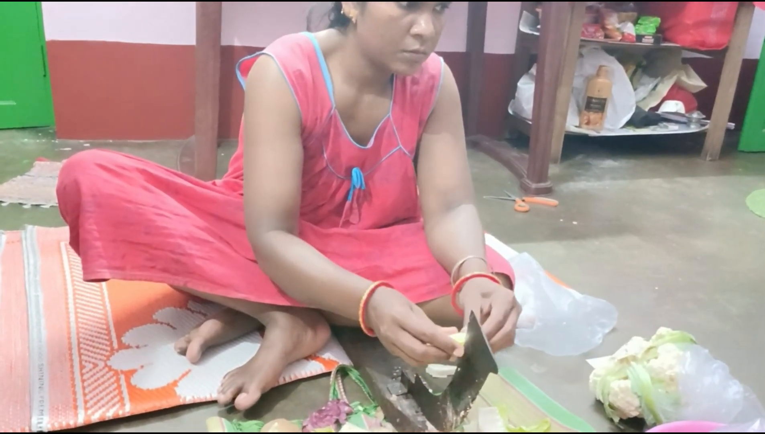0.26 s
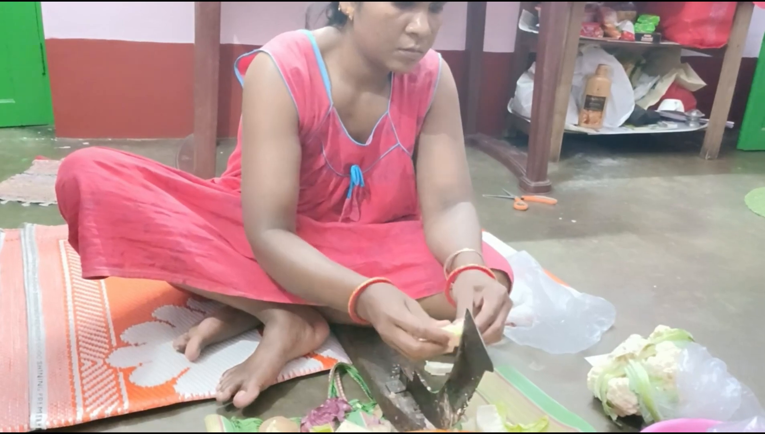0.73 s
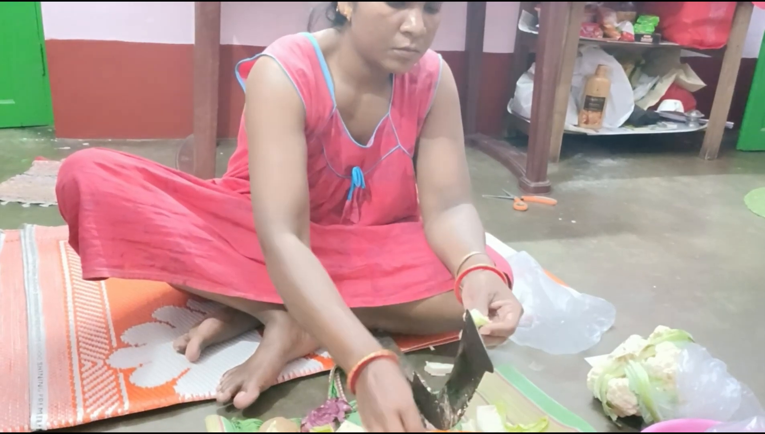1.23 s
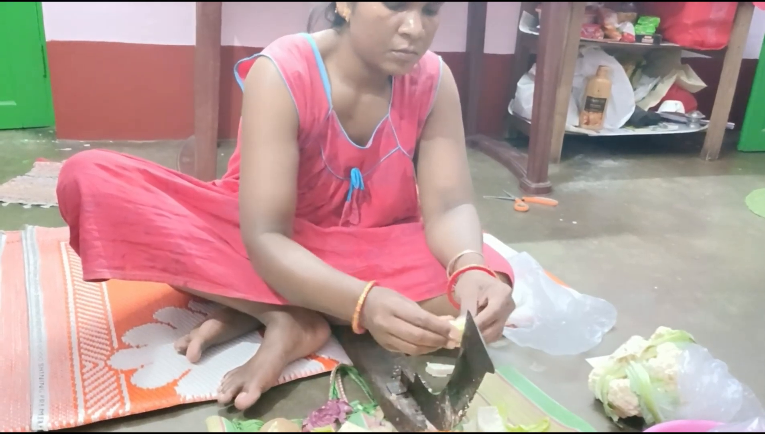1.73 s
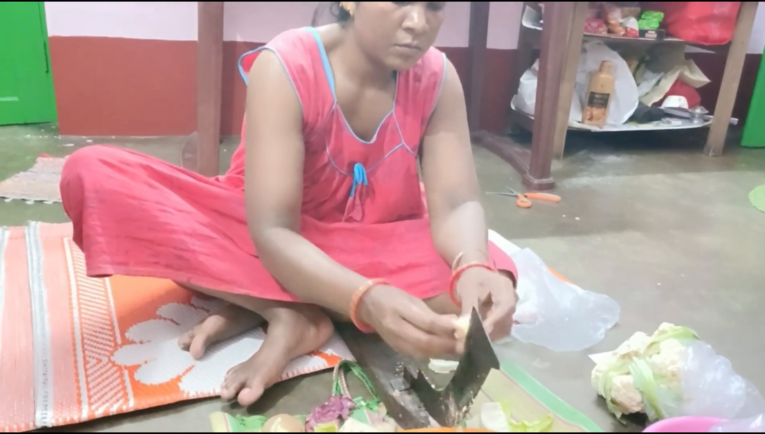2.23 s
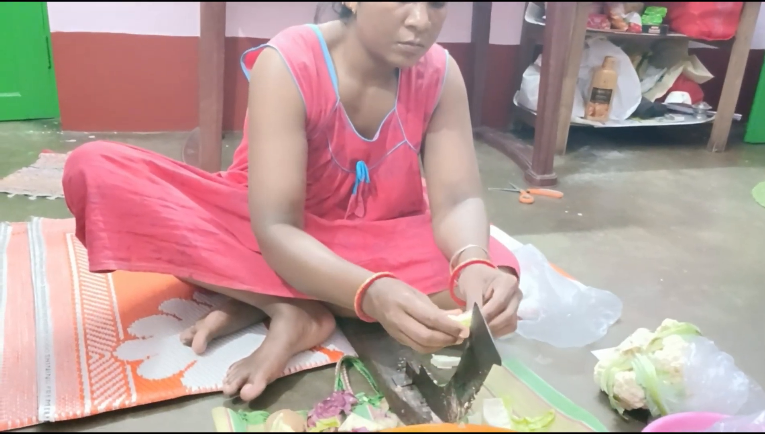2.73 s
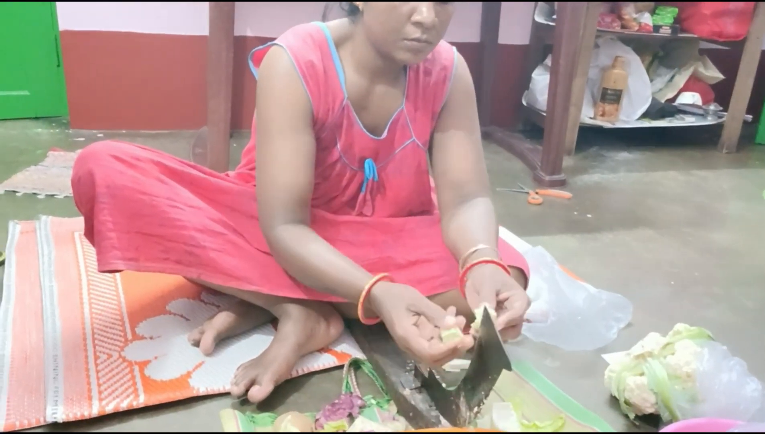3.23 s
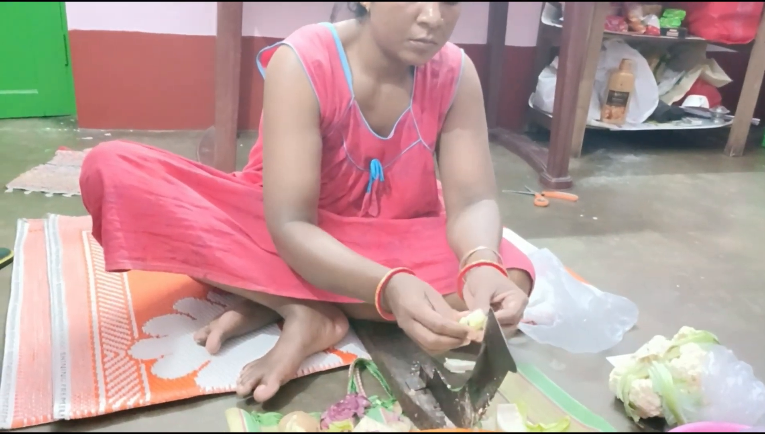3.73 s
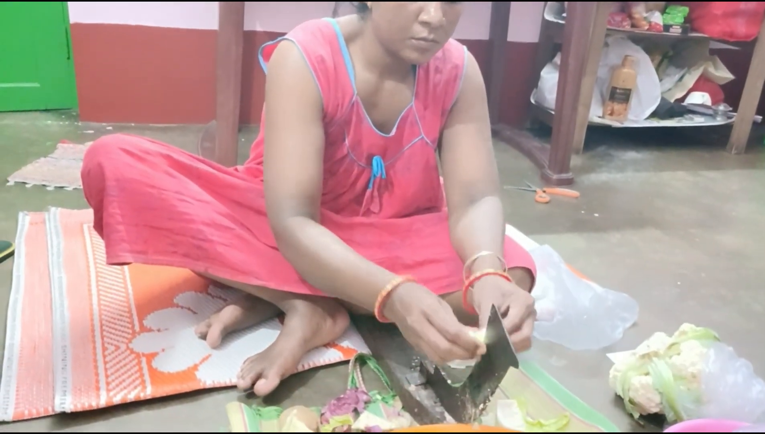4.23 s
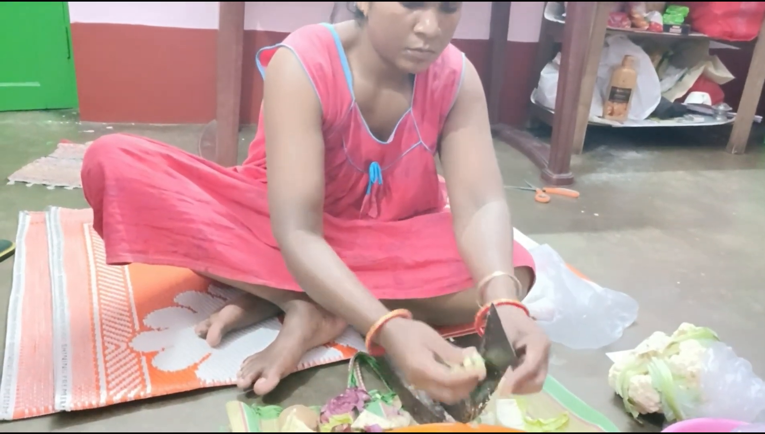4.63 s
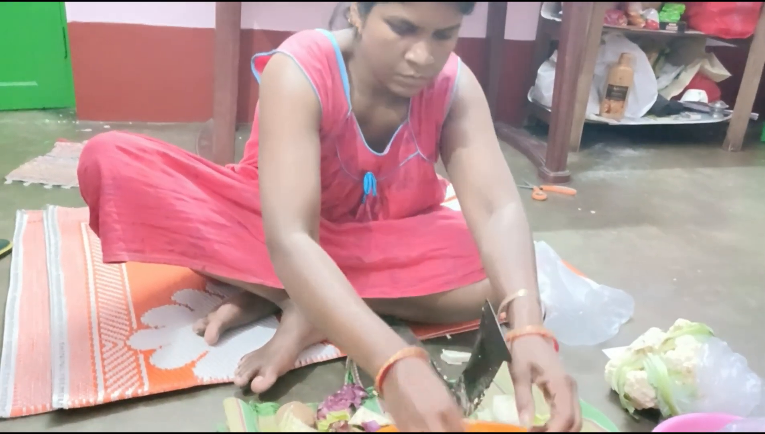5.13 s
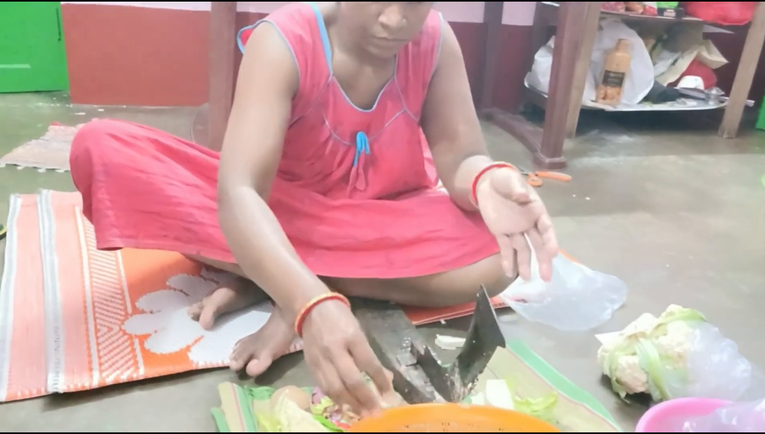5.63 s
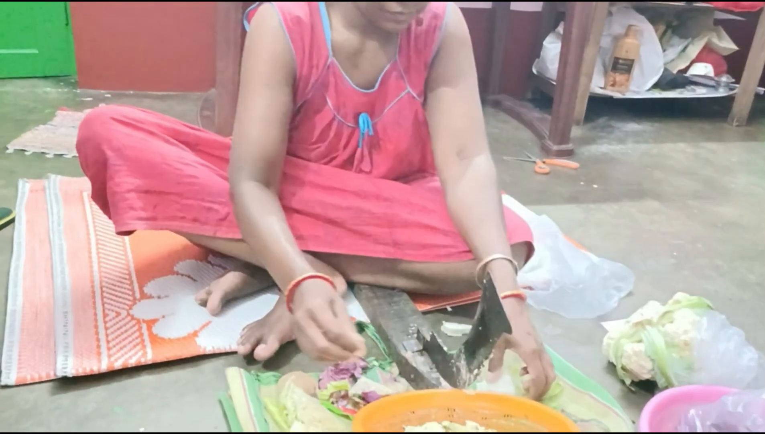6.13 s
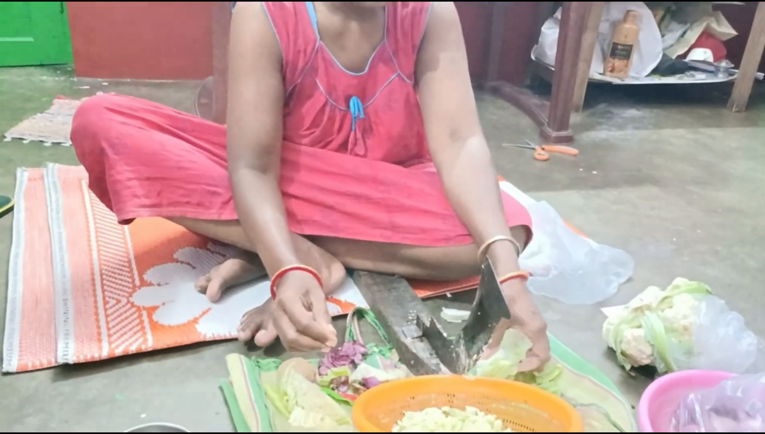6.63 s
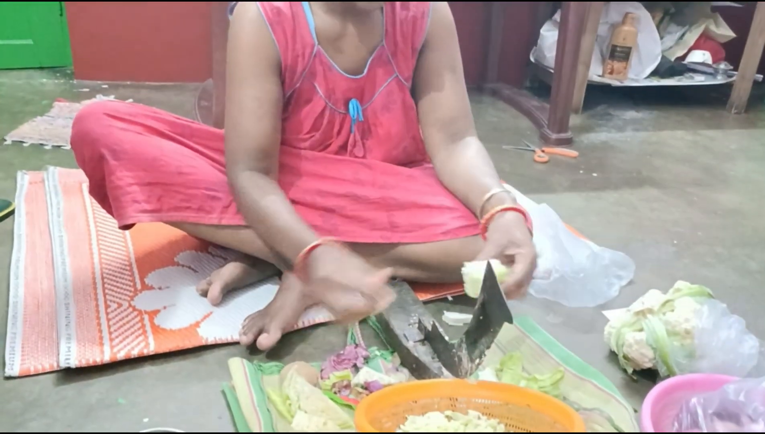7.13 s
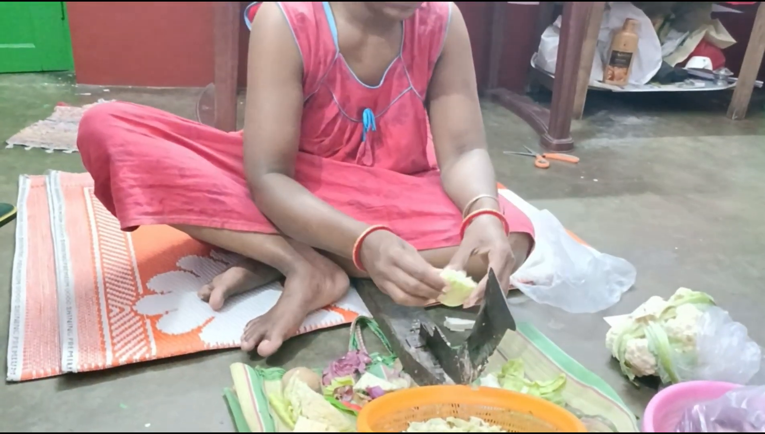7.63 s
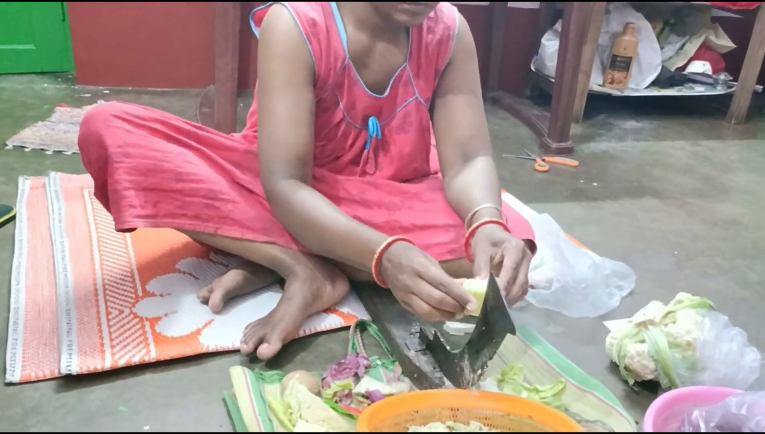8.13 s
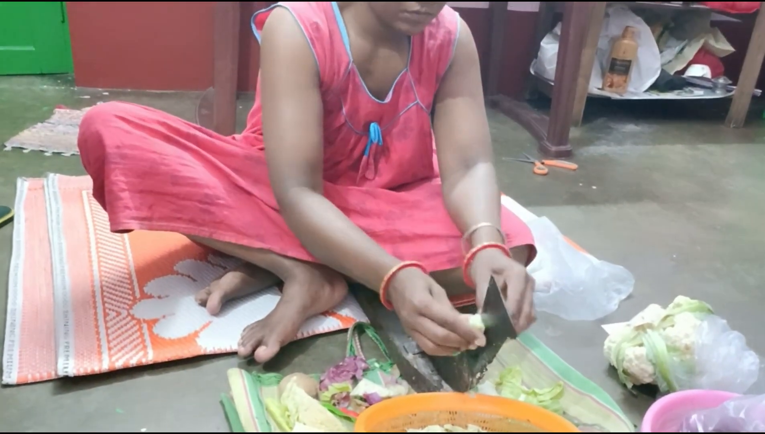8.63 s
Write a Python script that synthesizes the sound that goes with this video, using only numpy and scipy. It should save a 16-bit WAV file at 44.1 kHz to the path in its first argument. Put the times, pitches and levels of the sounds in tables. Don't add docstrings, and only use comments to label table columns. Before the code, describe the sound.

Cauliflower is broken against an upright steel blade, close to a phone microphone in a small hard-floored home. At 0-0.4 s crisp cuts and soft wooden knocks come with a faint steel ring. Light ticks follow, then a clear snap at 1.9 s and small pops near 2.1 and 2.5 s, with almost silent gaps until 3.2 s. From 3.4 s crunching and rubbing build, with low thuds; sharp stalk cracks crowd in from 4.1 s, a very hard snap lands at 4.5 s and another near 5.2 s amid bowl knocks. From 5.4 to 6.3 s scraps sweep over the mat in a bright, steady hiss. Short snaps and thuds cluster at 6.3-6.9 s, lighter ones around 7.2 s, crisp pops and rubbing at 7.6-8.2 s, then last cracks near 8.6 s and a hushed ending.

```python
import sys
import numpy as np
from scipy import signal
from scipy.fft import rfft, irfft, next_fast_len
from scipy.io import wavfile
from scipy.ndimage import uniform_filter1d, map_coordinates

SR = 44100
rng = np.random.default_rng(int(sys.argv[2]) if len(sys.argv) > 2 else 0)


def amplitude_ratio(level_db):
    exponent = np.asarray(level_db, float) / 20
    return 10 ** exponent


def wav_record(signal):
    frames = np.transpose(np.atleast_2d(signal))
    bounded = np.clip(frames, -1, 1)
    quanta = np.round(bounded * 32767).astype(np.int16)
    wavfile.write(sys.argv[1], SR, quanta)


N = 391166


def unit(x):
    return x / np.sqrt(np.mean(x ** 2) + 1e-20)


def along(points, hz):
    f, v = np.transpose(points)
    return np.interp(np.log(hz + 1), np.log(f + 1), v)


def wobble(rate, size):
    knots = rng.standard_normal(size // 8)
    return map_coordinates(knots, [np.arange(size) * rate / SR], order=1 + (rate < 100), prefilter=False)


def filtered(x, response):
    m = next_fast_len(N + SR // 2)
    return irfft(rfft(x, m) * response(np.fft.rfftfreq(m, 1 / SR)), m)[..., :N]


def above(hz, edge_hz):
    return 1 / (1 + (edge_hz / (hz + 1)) ** 6)


def patchy(depth_db, speckle):
    z = signal.stft(rng.standard_normal(N), nperseg=1024)[2]
    field = uniform_filter1d(rng.standard_normal(z.shape), size=12, axis=0)
    field = uniform_filter1d(field, size=3, axis=1)
    z = z * np.abs(z) ** speckle * amplitude_ratio(depth_db * unit(field))
    return unit(signal.istft(z, nperseg=1024)[1][:N])


def swells(s, rise, fade):
    late = np.arange(N * 1000 // SR + 2) / 1000 - s[:, None]
    return -60 * np.where(late < 0, -late / rise[:, None], late / fade[:, None]) ** 1.278


def summed(db):
    total = np.sqrt(np.sum(amplitude_ratio(2 * db), axis=0))
    return np.interp(np.arange(N) * 1000 / SR, np.arange(len(total)), total)


def hush(busy):
    # f/Hz, density/dB per Hz
    spectrum = [(18, -17.5), (30, 12), (90, 6.5), (702, -14.5), (780, -13), (2680, -19.5), (3770, -25),
                (4910, -19.5), (16000, -55)]
    level_db, follows, open_db = -64.5, 0.157, -59
    noise = patchy(depth_db=3, speckle=0.51)
    busy_db = 10 * np.log10(np.abs(uniform_filter1d(busy ** 2, size=SR // 8)) + 1e-10)
    sink_db = follows * np.minimum(busy_db - open_db, 0)
    gain = amplitude_ratio(level_db + sink_db + 1.2 * wobble(rate=3.8, size=N))
    return gain * unit(filtered(noise, lambda hz: amplitude_ratio(along(spectrum, hz))))


def room(x):
    # f/Hz, t60/s
    decay = [(150, 0.39), (1500, 0.28), (6000, 0.051), (12000, 0.042)]
    hz, t, z = signal.stft(rng.standard_normal(SR // 2), SR, nperseg=256)
    tail = signal.istft(z * amplitude_ratio(-60 * t / along(decay, hz)[:, None]), SR, nperseg=256)[1]
    return signal.fftconvolve(np.pad(x, (200, 0)), tail / np.linalg.norm(tail))[:N]


def steel():
    # f/Hz, level/dB
    modes = [(1098, -12), (1954, -4), (2008, -6), (3058, 2), (3601, -10), (4436, -5), (4484, -1),
             (5152, -2), (5200, -5), (6132, -6), (6153, -1), (7127, -5), (8070, -8), (9345, -10),
             (10260, -18), (12010, -21)]
    # t/s, level/dB, rise/s, fade/s
    rings = [
        (.36, -48, .2, .28),
        (1.39, -70, .01, .12),
        (1.62, -62, .4, .5),
        (1.86, -55, .5, .13),
    ]
    # start/s, end/s, f/Hz, level/dB
    lone = [
        (1.02, 1.07, 1070, -68),
        (1.03, 1.56, 9345, -85),
        (1.58, 1.66, 9345, -76),
        (1.17, 1.26, 6155, -81),
        (1.35, 1.44, 1093, -67),
        (.44, .53, 3058, -67),
        (1.57, 1.74, 1960, -57),
    ]
    size = 2 * SR
    t = np.arange(size) / SR

    def mode(hz):
        flutter = amplitude_ratio(6 * wobble(45, size))
        return flutter * np.sin(2 * np.pi * hz * t + 2.2 * wobble(80, size))

    def swell(start, end):
        return np.sin(np.pi * np.clip((t - start) / (end - start), 0, 1))

    s, peak_db, rise, fade = np.transpose(rings)
    envelope = summed(peak_db[:, None] + swells(s, rise, fade))[:size]
    together = envelope * unit(sum(amplitude_ratio(db) * mode(hz) for hz, db in modes))
    alone = sum(amplitude_ratio(db - 7) * swell(start, end) * mode(hz) for start, end, hz, db in lone)
    return np.pad(together + alone, (0, N - size))


def thuds():
    # t/s, peak/dB, f/Hz, t60/s
    knocks = [(0.254, -32.5, 289.3, 0.168), (0.323, -28, 299.4, 0.083), (0.843, -40, 291.3, 0.091),
              (1.01, -45, 284.4, 0.101), (1.714, -50, 272.8, 0.22), (1.876, -39, 217.4, 0.133),
              (3.363, -35, 241, 0.106), (3.516, -29, 171.9, 0.105), (3.64, -43, 505, 0.107),
              (3.64, -25.5, 152.5, 0.185), (4.032, -24.5, 149.7, 0.0716), (4.215, -32, 223, 0.156),
              (4.313, -19.5, 206, 0.034), (4.791, -17.5, 184.7, 0.104), (4.897, -23.5, 221, 0.132),
              (5.1, -20, 163.3, 0.121), (5.153, -17.5, 344, 0.039), (5.318, -33.5, 150.3, 0.11),
              (5.533, -29.5, 201, 0.072), (5.554, -29, 290.6, 0.07), (5.574, -31.5, 332, 0.068),
              (6.665, -29, 240, 0.118), (7.285, -41, 349, 0.11), (5.729, -34.5, 293.4, 0.098),
              (6.09, -44, 504, 0.18), (6.329, -27, 137.5, 0.041), (6.615, -23, 122.8, 0.125),
              (6.84, -34, 104.3, 0.087), (7.147, -37, 224, 0.114), (7.218, -28.5, 305, 0.09),
              (7.531, -48.5, 156.6, 0.064), (7.633, -44.5, 118, 0.18), (8.1, -30, 271.2, 0.19),
              (8.532, -37.5, 290.4, 0.08), (8.583, -37.5, 408.2, 0.18)]
    out, t = np.zeros(N + SR), np.arange(SR // 3) / SR
    for s, db, hz, t60 in knocks:
        swell = 1 - np.exp(-t / 0.0044)
        out[round(s * SR):][:len(t)] += amplitude_ratio(db - 60 * t / t60) * swell * np.sin(2 * np.pi * hz * t)
    return out[:N]


def hollows():
    # start/s, end/s, first f/Hz, last f/Hz, level/dB
    wide = [(7.535, 7.6, 2300, 2200, -57), (7.66, 7.72, 1900, 1800, -48), (.83, 0.92, 5300, 5880, -44),
            (5.927, 6.035, 1570, 1580, -31.5), (5.96, 6.17, 2400, 3000, -39), (6.842, 6.87, 780, 760, -41),
            (7.74, 7.89, 1450, 2100, -43), (7.72, 7.3, 3600, 3300, -46), (7.76, 7.89, 5500, 5100, -51.5),
            (2.045, 2.196, 1600, 1000, -53), (1.9, 2.1, 7400, 7900, -77), (4.765, 4.843, 3350, 2700, -29.5),
            (6.84, 6.941, 2500, 2200, -48), (1.716, 1.798, 2850, 3200, -48), (1.94, 2.03, 1080, 1050, -55),
            (8.74, 8.87, 4900, 3600, -65.5), (1.198, 1.58, 288.6, 287.7, -71),
            (5.1, 5.317, 1450, 1700, -25.5)]
    # start/s, end/s, first f/Hz, last f/Hz, level/dB
    tight = [(.245, 0.27, 4075, 4130, -45), (.322, 0.362, 5140, 5200, -43.5),
             (.322, 0.356, 6220, 6140, -48), (.305, 0.342, 2257, 2197, -37.5),
             (1.385, 1.428, 4110, 4040, -66), (1.385, 1.405, 7400, 7400, -70.5),
             (1.858, 1.93, 1060, 1040, -36), (5.525, 5.577, 694, 667.6, -41),
             (5.1, 5.16, 199.7, 209, -27.5), (5.11, 5.202, 388.2, 374, -30),
             (6.845, 6.911, 511.2, 503, -44), (4.328, 4.367, 1809, 1788, -27.5),
             (4.51, 4.555, 1700, 1650, -30), (4.671, 4.721, 1346, 1309, -32),
             (7.66, 7.737, 844.4, 891, -45.5), (7.66, 7.717, 1486, 1512, -42.5)]
    out, size = np.zeros(N + SR), SR // 3
    for start, end, first_hz, last_hz, db, width in [(*row, .38) for row in wide] + [(*row, .1) for row in tight]:
        u = np.clip(np.arange(size) / min(SR * (end - start), size), 0, 1)
        phase = 2 * np.pi * np.cumsum(first_hz + (last_hz - first_hz) * u) / SR
        width_hz = min(width * first_hz, 2500)
        narrow = wobble(width_hz, size) * np.sin(phase) + wobble(width_hz, size) * np.cos(phase)
        out[round(start * SR):][:size] += amplitude_ratio(db) * np.sin(np.pi * u ** 0.843) * narrow
    return out[:N]


def strokes():
    # t/s, peak/dB, fade to -60 dB/s, weight/dB, crispness/dB
    cuts = [(0, -38, 0.1854, -9.5, -9), (0.259, -34, 0.0646, -6.5, -11), (.277, -42, 0.128, -9, 8),
            (.307, -33.5, 0.1975, -7.5, -5), (.7, -73, 1.16, -11, 5.5), (1.388, -67.5, 0.12, -2.5, 3),
            (1.715, -46.5, 0.59, -8.5, -2.5), (1.873, -36, 0.3, -12.5, -2), (2.048, -54.5, 0.39, 0, -10.5),
            (2.467, -61.5, 0.3669, 5.5, 13.5), (3.2, -56, 0.12, 1.5, -1.5), (3.371, -37, 0.27, -4.5, 5),
            (3.596, -40, .3, -8, 4.5), (4.046, -42.5, 0.42, 0, -4), (4.22, -31.5, 2, -13.5, -5),
            (4.506, -28, 0.9, -7.5, 0.5), (4.66, -28.5, 1.92, -6.5, -8), (5.18, -24.5, 0.2628, -8.5, -3.5),
            (5.391, -33.5, 0.36, -21, 0), (6.346, -42, 1.5, 1, 2), (6.61, -34, 0.3167, 0, -2.5),
            (6.841, -39.5, 0.0176, 1.5, -9.5), (7.531, -59.5, 0.01, 5.5, -10),
            (7.657, -41.5, 1.62, -9.5, -18), (8.01, -45, 1.5241, -13, -23), (8.47, -49, 0.01, -0.5, -4.5),
            (8.513, -62, 0.45, 11, 1)]
    # t/s, peak/dB, rise/s, fade/s, brightness/dB
    rubs = [(.335, -38.5, 0.2224, 0.15, 2.5), (.4, -47.5, 0.3, 0.154, 3), (.866, -54, .3, 0.373, -6.5),
            (1.626, -76, 0.43, 0.18, -0.5), (1.773, -57, 0.097, 0.28, -1.5), (3.245, -57, 0.13, .2, 5),
            (2.685, -77, 0.11, 0.13, 14), (3.412, -40, .06, .1, 6), (3.69, -35, .06, .1, 3),
            (3.5, -38, 0.375, 0.35, 2.5), (3.634, -28.5, 0.172, 0.481, -3), (3.8, -42, 0.64, 0.292, -16.5),
            (3.99, -54.5, 0.089, 0.068, -8), (4.124, -29, 0.1625, 0.332, -1.5),
            (4.236, -30.5, 0.055, 0.11, 1.5), (4.364, -27, 0.289, 0.484, 0), (4.57, -33, 0.16, 0.443, 0.5),
            (4.8, -26.5, 0.26, 0.326, 5.5), (4.96, -26, 0.362, 0.94, 3), (5.13, -24, 0.298, 0.62, -1),
            (6.47, -43, 0.68, 0.998, -13), (6.734, -35.5, 0.11, 0.349, -12.5),
            (7.232, -37, 0.245, 0.18, -6), (7.29, -40.5, 0.19, .2, -9), (7.375, -44.5, 0.18, 0.17, -5),
            (7.845, -43, 0.664, 0.55, -0.5), (8.133, -32, 0.378, 0.493, -4.5),
            (8.592, -44, 0.06, 0.187, -5), (8.87, -59, 0.67, .3, -1)]
    # t/s, peak/dB, rise/s, fade/s, brightness/dB
    sweeps = [(.88, -53.5, 0.14, 0.14, 12.83), (2.515, -52.5, 0.12, 0.14, 7.9), (2.85, -76.5, .06, 0.35, 7),
              (7.76, -56, .1, 0.092, 7.8), (2.3, -75.5, 0.28, 0.27, 14.5), (5.2, -32.5, 0.21, 0.15, 13),
              (5.545, -36, 0.34, 0.45, 7.38), (5.72, -37.5, 0.93, 0.83, 9.35),
              (5.87, -37, 0.54, 0.79, 7.15), (5.97, -34, .2, 0.4, 1.17), (6.09, -35, 0.84, 0.611, 5),
              (6.22, -39.5, .4, 0.52, 1.15), (8.36, -63.5, .5, .6, 8.55), (8.54, -63.5, .1, 0.14, 11),
              (8.65, -62.5, 0.11, .06, 12.9), (8.74, -67.5, 0.069, .1, 9.7)]
    bite_s, lightens = 0.0056, 0.16
    air_db, sweep_air_db = -24.5, -20
    rows = [(s, db, bite_s, fade, weight_db, crisp_db, air_db, .27) for s, db, fade, weight_db, crisp_db in cuts]
    for table, weight_db, hiss_db, grit in [(rubs, -4.5, air_db, .3), (sweeps, -14.5, sweep_air_db, .08)]:
        for s, db, rise, fade, bright_db in table:
            rows.append((s, db, rise, fade, weight_db - lightens * bright_db, bright_db, hiss_db, grit))
    return np.transpose(rows)


def slips(per_second, t60):
    jumps = (rng.random(N) < per_second / SR) * (.3 + rng.random(N))
    return signal.lfilter([1], [1, -amplitude_ratio(-60 / t60 / SR)], jumps)


def cracks(count, spread_db, cycles, force):
    density = np.cumsum(force + .1)
    when, pitch, size = rng.random((count, 3)).T
    start = np.searchsorted(density, when * density[-1])
    hz = (250 * 56 ** pitch)[:, None]
    t = np.arange(SR // 100) / SR
    gain = amplitude_ratio(-spread_db * np.log(size * .94 + .06))[:, None] * hz ** .8
    sign = (-1.) ** np.arange(count)[:, None]
    grains = sign * gain * np.sin(2 * np.pi * hz * t) * amplitude_ratio(-60 * t * (hz / cycles + 66.0))
    places = start[:, None] + np.arange(len(t))
    return unit(np.bincount(places.ravel(), grains.ravel(), N + SR)[:N])


def colour(hz):
    # f/Hz, density/dB per Hz
    floret = [(24, -32), (40, -1), (151, -6.5), (297, -5), (337, -8), (455, -10.5), (697, -7), (1070, -9),
              (1630, -6), (2320, -7.5), (4930, -2.5), (8770, -12), (11800, -8.5), (16000, -17.5)]
    # f/Hz, width/Hz, lift/dB
    body = [(153.38, 5.83, 13), (334.46, 9.9, 5), (676.2, 9.3, 4), (805.2, 12, 4.5), (971.7, 13, 5.5),
            (1253.5, 36, 3.5), (1381, 34, 4), (1650, 21, 3.5), (1914, 40, 3), (3342, 94, 3.5),
            (4800, 330, 1.5)]
    lift_db = sum(db / (1 + (2 * (hz - c) / w) ** 2) for c, w, db in body)
    return amplitude_ratio(along(floret, hz) + lift_db)


def handling():
    split_hz = [600, 2800, 7500]
    s, db, rise, fade, weight_db, crisp_db, air_db, share = strokes()
    shape_db = swells(s, rise, fade)

    def layer(over_db, depth):
        return summed((db + over_db)[:, None] + depth * shape_db)

    def bands(hz):
        steps = [1 + 0 * hz] + [above(hz, edge) for edge in split_hz] + [0 * hz]
        return -np.diff(steps, axis=0) * colour(hz)

    crunch = layer(0, 0.985)
    grit = (layer(10 * np.log10(np.clip(share, .01, 1)), 1) / (crunch + 1e-9)) ** 2
    rubbing = patchy(depth_db=1.5, speckle=0.308)
    force = slips(per_second=45, t60=.09)
    tearing = cracks(count=9000, spread_db=0.5, cycles=8.4, force=force)
    source = np.sqrt(1 - grit) * rubbing + np.sqrt(grit) * tearing
    source = source * (1 + 0.14 * grit * force)
    parts = filtered(source, bands)
    air_db = crisp_db + air_db - 0.229 * (db + 45.5)
    weight = layer(weight_db - 1.5, 0.829)
    crisp = layer(crisp_db - 5.5, 1.07)
    air = layer(air_db, 0.688)
    levels = [weight, amplitude_ratio(-2.0) * crunch, crisp, air]
    return sum(level * unit(part) for level, part in zip(levels, parts))


def snaps():
    # t/s, peak/dB, f/Hz
    breaks = [(.8364, -44.5, 5600), (1.2737, -57.5, 4000), (1.4694, -58, 6100), (3.6122, -32, 3300),
              (3.687, -28, 5500), (3.81, -38, 5500), (4.2204, -22, 1393), (4.5586, -16, 1650),
              (4.606, -20, 830), (4.8864, -15, 1780), (4.9314, -14.5, 1870), (5.1838, -4, 1340),
              (5.5389, -25.5, 5100), (7.3432, -37.5, 6470), (8.2141, -37, 988), (8.533, -47, 7400)]
    # t/s, peak/dB, f/Hz
    clean = [(.2204, -63, 3900), (.2523, -32.5, 4130), (1.3897, -48.5, 1970), (1.8725, -17.5, 1087),
             (2.4985, -29.5, 4960), (4.0457, -32, 805), (4.0976, -16.5, 2256), (4.3387, -16, 1830),
             (4.4858, -19, 1790), (4.6619, -15.5, 1170), (4.7436, -18, 1700), (4.8784, -10.5, 1790),
             (5.3921, -23.5, 1430), (6.4979, -41.5, 1560), (6.5183, -30, 785), (6.7043, -29.5, 985),
             (6.7109, -26.5, 993), (7.2207, -35, 990), (7.2297, -29.5, 1070), (7.241, -33, 900),
             (6.7491, -22, 1153), (7.5587, -45, 4200), (8.0107, -23.5, 2150), (8.08, -18.5, 2190),
             (8.1172, -19, 2270), (8.1244, -15, 940), (8.1785, -39.5, 2500), (8.488, -39, 1090),
             (8.5136, -28, 4800), (8.572, -21.5, 4650), (8.6328, -28, 2145), (8.743, -43.5, 986)]
    # t/s, peak/dB, f/Hz
    crushes = [(2.2922, -48, 2500), (2.4674, -34, 5070), (3.2005, -48.5, 1710), (3.3716, -21.5, 1920),
               (3.5089, -25, 1510), (3.352, -46, 3000), (5.1187, -17, 1290), (5.1385, -15.5, 1570),
               (6.4083, -27, 2060), (6.554, -29, 1490), (6.605, -26, 1200), (6.6154, -21.5, 1255),
               (7.0125, -47, 2930), (7.1442, -40, 945), (8.0583, -22.5, 1690), (8.1118, -16, 2370),
               (8.3585, -41.5, 1770), (8.4721, -35, 1040)]
    # t/s, peak/dB, f/Hz
    pops = [(.2575, -29, 900), (1.7158, -34, 1050), (1.7175, -36, 2500), (1.8605, -40, 1900),
            (1.8728, -24, 5000), (2.138, -44, 1300), (7.3436, -33, 2060), (7.399, -38, 1900),
            (8.086, -20, 2500), (.3086, -23.5, 2246), (2.049, -31.5, 1124), (2.0779, -28.5, 1160),
            (2.132, -46, 4600), (3.3672, -28, 5940), (3.6275, -26, 1290), (3.8112, -23, 1340),
            (3.849, -24.5, 1820), (3.9634, -37, 1145), (4.2892, -15.5, 1510), (4.5054, -4, 1738),
            (5.1576, -8, 1580), (5.3921, -17.5, 1506), (6.348, -17, 2590), (6.3475, -23.5, 1510),
            (6.7293, -15, 1110), (6.7297, -24, 2600), (6.7987, -24, 1720), (6.8395, -16, 2286),
            (7.1626, -33.5, 923), (7.1928, -24, 1515), (7.2105, -35.5, 1300), (7.249, -30, 1300),
            (7.3684, -32, 819), (7.6767, -28, 1550), (4.5056, -12, 3400), (4.543, -16.5, 1700),
            (6.7495, -21.5, 2480), (6.8385, -24, 3500), (6.858, -27, 2300), (7.5353, -38, 875),
            (7.9768, -27, 1600), (7.615, -28.5, 1471), (7.658, -20, 1173), (7.7545, -36, 1140),
            (7.812, -25, 1600), (7.855, -19.5, 1900), (7.872, -24, 1750), (8.0458, -31.5, 1960),
            (8.2733, -30, 947), (8.4334, -38.5, 947), (8.5901, -28.5, 917)]
    # rows, sharpness/dB, crumbling/dB
    kinds = [(breaks, -1.8, -13), (clean, -7.5, -28), (crushes, -9, -15), (pops, -25.5, -24.5)]
    out, t = np.zeros(N + SR), np.arange(SR // 4) / SR
    bright = signal.butter(N=3, Wn=[2500, 7500], btype="band", fs=SR, output="sos")
    for s, db, hz, sharp_db, crumble_db in [(*row, *kind) for rows, *kind in kinds for row in rows]:
        crack_noise, crumbs = rng.standard_normal((2, len(t)))
        cycles = np.sin(2 * np.pi * hz * t) * amplitude_ratio(-60 * t * hz ** .5 / .3) * (1 - np.exp(-t / .0004))
        crack = amplitude_ratio(sharp_db + 7.0) * signal.sosfilt(bright, crack_noise * amplitude_ratio(-60 * t / 0.01093))
        finest_edge = np.diff(crack_noise, prepend=0) * amplitude_ratio(-60 * t / 0.0035)
        crack = crack + amplitude_ratio(sharp_db - 10.0) * finest_edge
        round_pitch = signal.butter(N=2, Wn=[.5 * hz, min(1.71 * hz, 7500)], btype="band", fs=SR)
        crumble = amplitude_ratio(crumble_db - 60 * t / 0.2196) * unit(signal.lfilter(*round_pitch, crumbs))
        out[round(s * SR):][:len(t)] += amplitude_ratio(db) * (amplitude_ratio(1.5) * cycles + crack + crumble)
    return filtered(out[:N], lambda hz: 1 - .8 * above(hz, 7800))


def scene():
    hits = snaps() + thuds()
    wet = amplitude_ratio(-13) * room(hits)
    busy = hits + wet + handling() + hollows() + steel()
    return (busy + hush(busy))[None]


def low_pass(x):
    return signal.sosfilt(signal.butter(12, 16440, fs=SR, output="sos"), x)


def record(dry):
    limited = dry / (1 + (dry / .85) ** 4) ** .25
    heard = filtered(limited, lambda hz: above(hz, 61.37) ** 1.526 * (hz < 15800))
    return low_pass(heard)


dry = scene()
out = record(dry)
wav_record(out)
```